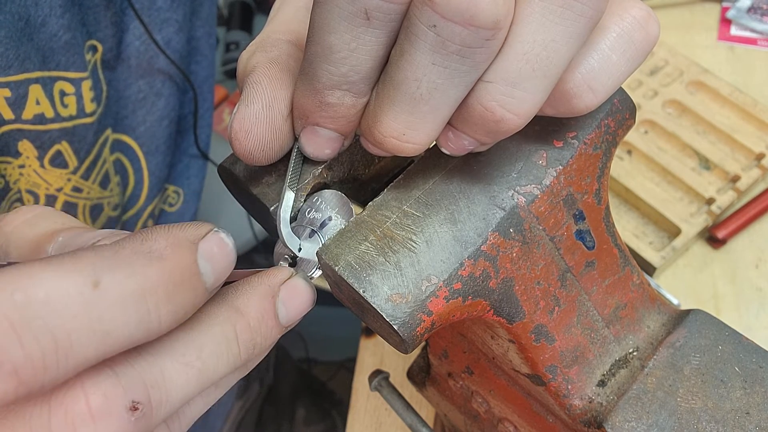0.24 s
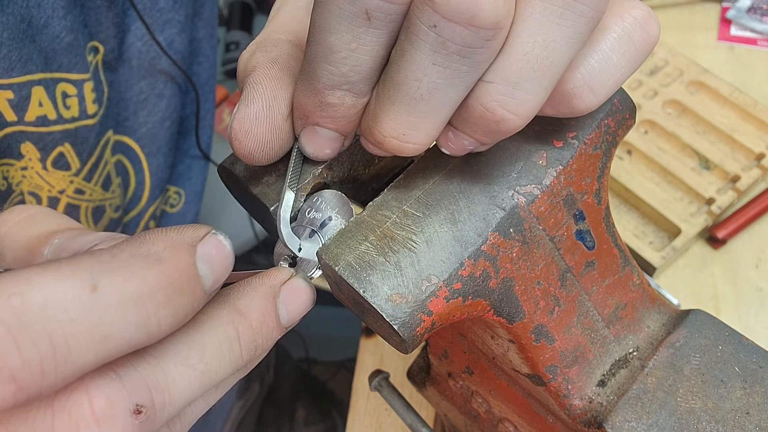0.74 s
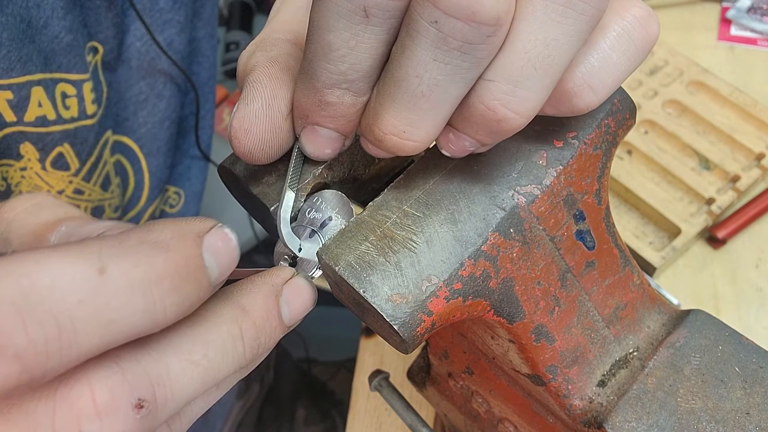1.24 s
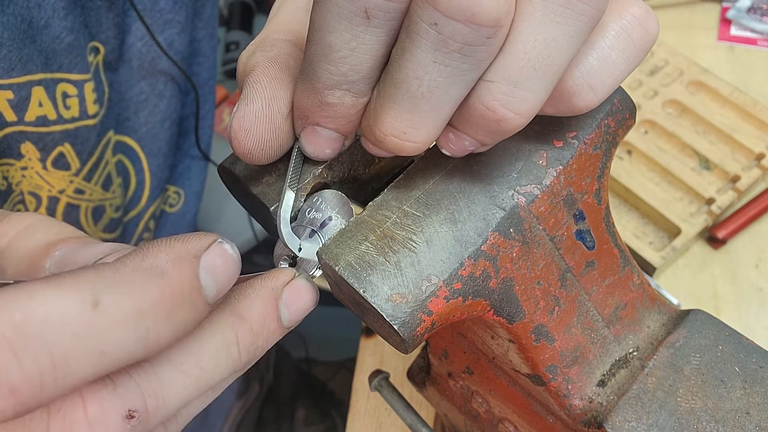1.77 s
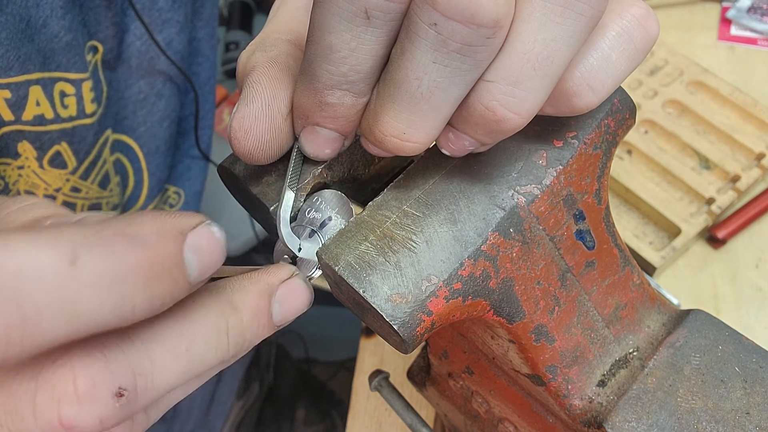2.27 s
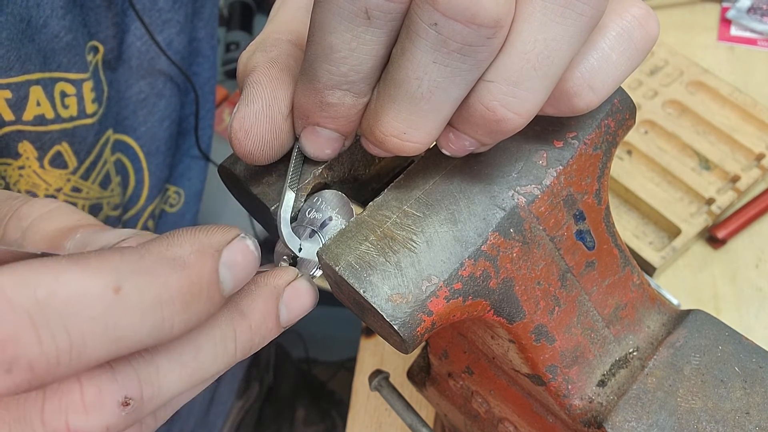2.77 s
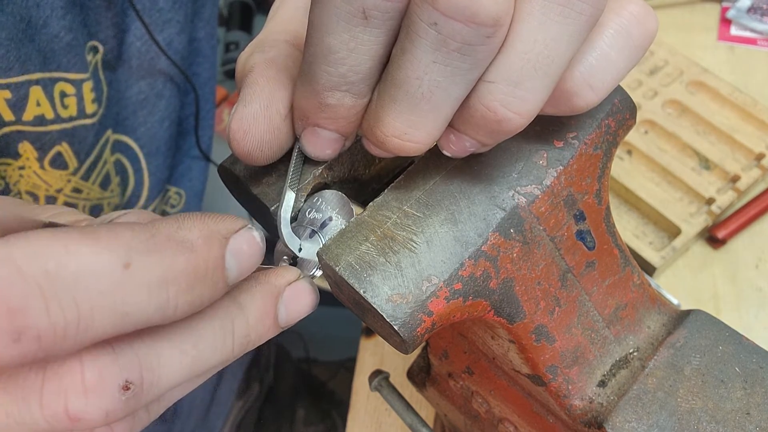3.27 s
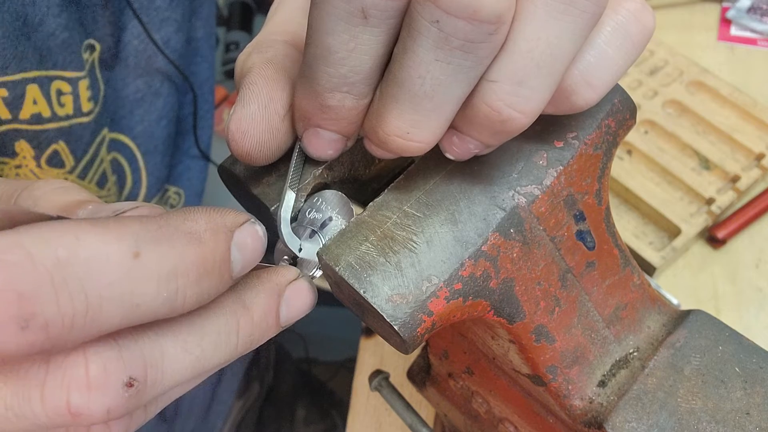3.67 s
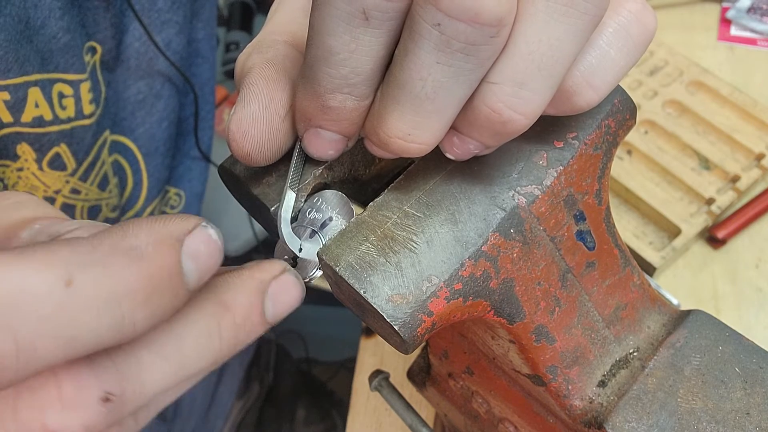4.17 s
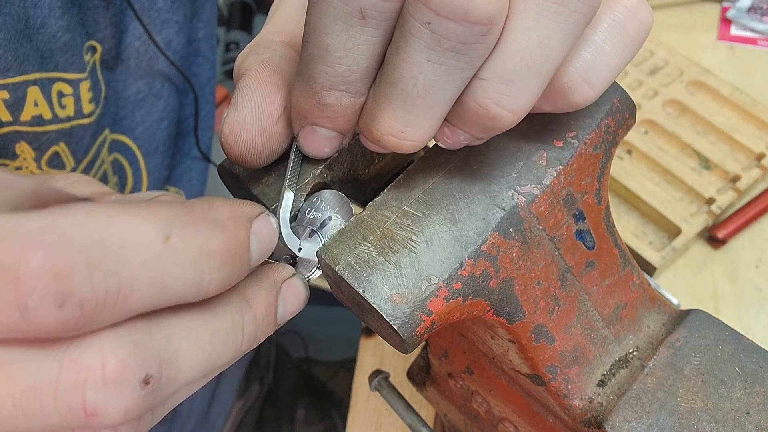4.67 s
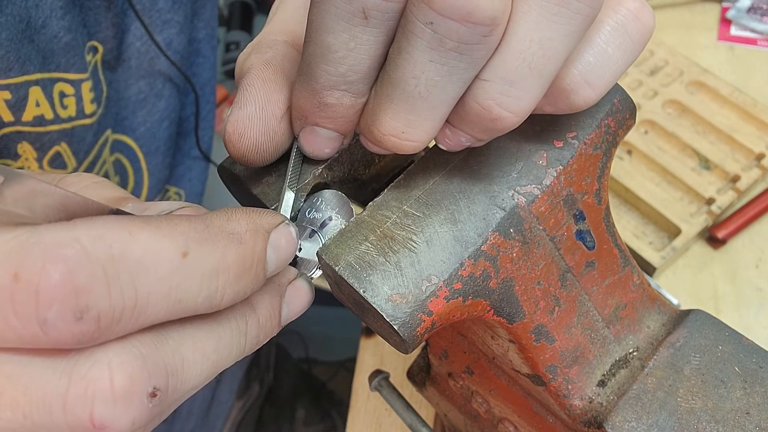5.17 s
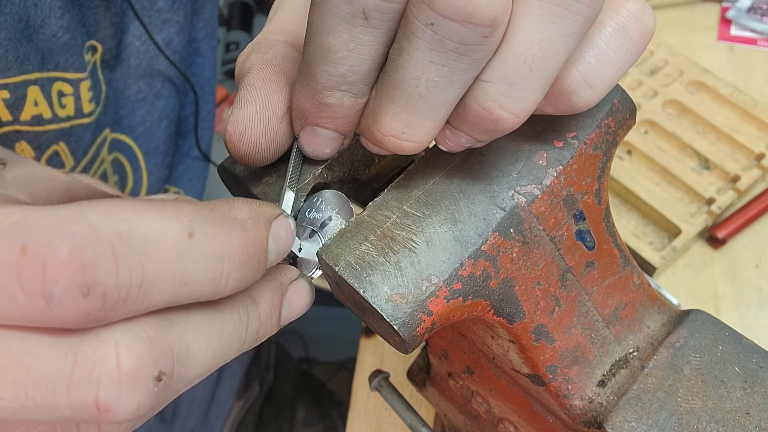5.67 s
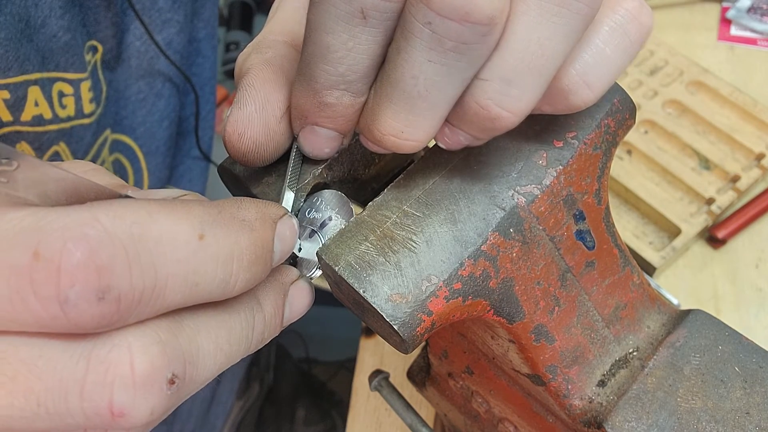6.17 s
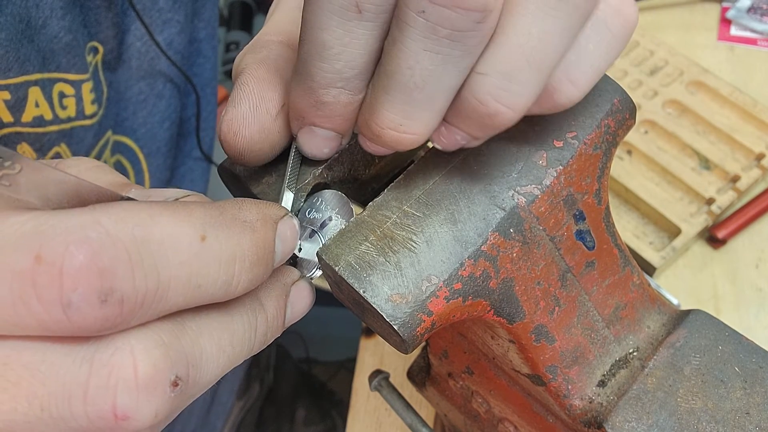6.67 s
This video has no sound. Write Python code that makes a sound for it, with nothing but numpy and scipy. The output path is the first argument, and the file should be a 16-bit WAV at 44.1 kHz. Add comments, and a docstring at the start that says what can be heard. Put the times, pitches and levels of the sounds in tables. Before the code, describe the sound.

A steel pick clicks, ticks and faintly scrapes inside a lock, with two sharp pin snaps over a low steady hum.

```python
"""A steel pick probes the pins of a lock clamped in a bench vice, heard from close by.
Freed pins snap, the pick scrapes and ticks along the keyway, and a hand softly bumps the vice.
Every contact makes lock, tools and vice ring with a set of quickly fading tones.
A small workshop adds a short echo, over a low machine hum, rumbling air and faint hiss."""
import sys
import numpy as np
from scipy import signal
from scipy.fft import rfft, irfft
from scipy.io import wavfile

SR = 44100
rng = np.random.default_rng(int(sys.argv[2]) if len(sys.argv) > 2 else 0)


def unload_audio(sound):
    """Save the sound as a 16-bit wav file, at the path given as the first command line argument."""
    columns = np.transpose(np.atleast_2d(sound))
    # keep every value between -1 and 1, then stretch to whole-number steps
    steps = np.round(np.clip(columns, -1, 1) * 32767)
    wavfile.write(sys.argv[1], SR, steps.astype(np.int16))


N = 306035

# how loud the machine hums over time: t/s, level/dB
HUM_LEVELS = [(0.0, -49), (0.11, -39), (0.25, -60), (0.31, -43), (0.73, -55), (0.81, -80), (0.87, -45.5),
              (1.35, -51), (2.61, -42.5), (3.75, -45.5), (3.94, -39.5), (4.1, -51), (4.91, -56),
              (4.95, -45), (6.67, -42), (6.94, -49)]
# weak overtones and whines above the hum: f/Hz, level/dB
HUM_TONES = [(119.9, -59.5), (179, -69), (210.6, -67.5), (308, -68), (480, -74), (540, -70), (660, -75),
             (1260, -82), (1500.5, -72), (3001, -83)]
# air noise of the workshop: f/Hz, level/(dB per Hz)
AIR_RUMBLE = [(15, -80.5), (30, -80), (46, -70.5), (70, -66), (100, -72.5), (145, -81), (220, -82),
              (330, -83.5), (560, -91.5), (820, -91.5), (1100, -101), (1450, -101), (2000, -114),
              (4000, -130)]
# microphone hiss: f/Hz, level/(dB per Hz)
MIC_HISS = [(2850, -112), (3100, -106), (6800, -107), (7300, -113), (9500, -112), (12900, -114),
            (13600, -109), (15800, -111)]
# tones that lock, tools and vice ring with: f/Hz, energy/dB, t60/s (time to fade by 60 dB)
METAL_TONES = [(226, -21.5, 0.31), (432, -9.5, 0.026), (1400, -22, 0.0061), (1640, -2, 0.0088),
               (1820, -7.5, 0.0092), (2120, -5.5, 0.018), (2530, -12.5, 0.0031), (2850, -8, 0.019),
               (3094, -6.5, 0.032), (3372, -7, 0.1), (4330, -40, 0.081), (5030, -9.5, 0.014),
               (6130, -19, 0.0036), (8500, -2.5, 0.0011), (8950, -10.5, 0.0017), (13300, -17, 0.0037)]
# a pin snaps free: t/s, strength/dB, vice knock/dB, lock ring/dB, pick pitch/Hz, pick ping/dB,
# wrench clack/dB, wrench overtone/dB, delay of second blow/s, second blow against first/dB
PIN_SNAPS = [(0.3056, -9, -39.5, 0.5, 1640, -3, -2.5, -9, 0.0019, -9.5),
             (1.9977, -21, -41.5, 4, 1880, 6, -5.5, 4.5, 0.001302, 10.5)]
# the thin, very brief ring of a pin: f/Hz, energy/dB, t60/s
PIN_TONES = [(4970, -8.5, 0.013), (6400, -27.5, 0.0093), (8830, -8, 0.01), (13700, 2.5, 0.0076)]
# the tension wrench that turns the lock, damped by a finger: f/Hz, level/dB, t60/s
WRENCH_TONES = [(1207, -29.5, 0.033), (1275, -31, 0.013)]
# how long the room echoes: f/Hz, t60/s
ECHO_TIMES = [(200, 0.74), (1200, 0.46), (3400, 0.42), (8000, 0.49), (15000, 0.43)]
# tone colour of the echo: f/Hz, level/dB
ECHO_COLOUR = [(400, 0.5), (750, 0), (1300, -2.5), (1750, -3.5), (2150, -6.5), (2600, -6.5), (3400, -7),
               (4500, -10.5), (6000, -15), (9000, -17), (11500, -15), (13800, -24)]
# strokes along the keyway: start/s, end/s, strength/dB, lock ring/dB, squeak/dB, pick pitch/Hz
PICK_STROKES = [(1.451, 1.59, -67.5, 5.5, -14, 2020), (1.711, 1.802, -66, 1.5, -8, 1860),
                (2.245, 2.328, -63, 0, -12, 1900), (2.41, 2.494, -67, 2, -3, 1800),
                (2.507, 2.626, -68, 5, -16, 1850), (2.74, 2.804, -68, 5, -10, 1950),
                (4.059, 4.163, -57.5, 5, -14, 2730), (4.21, 4.26, -70, 8, -15, 2160),
                (4.33, 4.408, -61.5, 1, -32, 2120), (4.51, 4.593, -58.5, 4, -2, 1840),
                (5.026, 5.123, -67, 2, -12, 1640)]
# touches of the pick, single or in quick runs: t/s, strength/dB, lock ring/dB, slide/ms, ping pitch/Hz (the
# pick's, or a pin's for the highest)
PICK_TOUCHES = [(1.539, -49, 15, 2.3, 2070), (1.736, -52, -8, .3, 1800), (1.772, -52, 4, .3, 1770),
                (2.182, -25.5, 2, 0.45, 3380), (2.185, -22.5, 3, 1.5, 2020), (2.1872, -21.5, 9, 1.1, 1620),
                (2.203, -34, 10, 3, 1640), (2.2272, -27.5, 2.5, 1.5, 3300), (2.304, -39.5, 11.5, 2.2, 3270),
                (2.4487, -41, 1, 0.6, 1810), (2.5793, -42, 13, 4.6, 1800), (2.797, -49, 2, 2.6, 6000),
                (4.068, -40, 14, 2.2, 1550), (4.0758, -22, -9, 1.4, 3000), (4.084, -22.5, 0, 0.66, 3200),
                (4.085, -23, 6, 2.7, 3300), (4.093, -30, 0, 0.56, 2980), (4.1125, -22, 5, 0.44, 9300),
                (4.1181, -31, 11, 1.1, 3180), (4.1295, -29, 0, .6, 2140), (4.1309, -27, 2, 1.8, 3000),
                (4.164, -20, 2, 0.68, 1690), (4.167, -15, 7, 1.4, 2120), (4.1722, -13.5, 6, 1.1, 1820),
                (4.1765, -19.5, 2, 1.1, 2100), (4.179, -16.5, 5, 2, 3200), (4.2328, -31, -8, 1.1, 8200),
                (4.245, -37, 3, 1.6, 9000), (4.404, -31.5, 11, 2, 3340), (4.585, -27.5, 6, 2.2, 2090),
                (4.844, -29.5, 8.5, 2.3, 2390), (4.986, -34, 0, 4.4, 3120), (5.014, -23.5, 2, 6.4, 1656),
                (6.0402, -24.5, -6, 1.3, 1620)]
# the hand bumps the vice: t/s, strength/dB, slide/ms, pick pitch/Hz
HAND_BUMPS = [(6.32, -33, 18, 2100)]
# flesh passes almost no treble: f/Hz, level/dB
FLESH_COLOUR = [(300, 17), (1000, 14), (1600, 4), (2100, 3), (4000, -9), (9000, -42)]


def amp(db):
    """Turns decibels into a gain."""
    return 10 ** (np.asarray(db) / 20)


def unit_rms(x):
    """Scales a signal to an average (rms) level of 1."""
    return x / np.sqrt(np.mean(x ** 2) + 1e-20)


def look_up(points, hz):
    """Reads between the rows of a table, on a log-frequency axis."""
    f, value = np.transpose(points)
    return np.interp(np.log(hz + 1), np.log(f + 1), value)


def add(mix, s, sound):
    """Mixes a sound in at s seconds."""
    part = mix[round(s * SR):][:len(sound)]
    part += sound[:len(part)]


def drift(rate_hz):
    """Smooth random wobble; a higher rate moves faster."""
    hz = np.fft.rfftfreq(N, 1 / SR)
    return unit_rms(irfft(rfft(rng.standard_normal(N)) * np.exp(-(hz / rate_hz) ** 2), N))


def tint(x, points):
    """Colours a sound by an f/Hz, level/dB table, with no ringing ahead of it (minimum phase)."""
    size = 1024
    log_gain = np.log(amp(look_up(points, abs(np.fft.fftfreq(size, 1 / SR)))))
    taps = np.fft.ifft(np.exp(np.conj(signal.hilbert(log_gain)))).real
    return signal.fftconvolve(x, taps[:size // 2])[:len(x)]


def machine_hum(hum_hz=59.23, waver_hz=0.91, throb=0.24, tone_waver_hz=0.62, tone_throb=0.18):
    """A machine hums low, with weak tones above; all waver in pitch and loudness."""
    level_db = np.interp(np.arange(N) / SR, *np.transpose(HUM_LEVELS))
    turns = np.cumsum(hum_hz + waver_hz * drift(6)) / SR
    out = amp(level_db) * unit_rms(np.sin(2 * np.pi * turns) * (1 + throb * drift(53)))
    sway, wander = drift(37), drift(1.76)
    for hz, db in HUM_TONES:
        lag = rng.integers(N)  # each tone wobbles in its own time
        turns = np.cumsum(hz + tone_waver_hz * np.roll(wander, lag)) / SR
        out += amp(db) * unit_rms(np.sin(2 * np.pi * turns) * (1 + tone_throb * np.roll(sway, lag)))
    return out


def steady_noise(points):
    """Air rumble or hiss: even noise shaped by a table."""
    gain = amp(look_up(points, np.fft.rfftfreq(N, 1 / SR))) * np.sqrt(SR / 2)
    return irfft(rfft(rng.standard_normal(N)) * gain, N)


def lock_ring(thud_db, ring_db, sharp_db, pick_hz, pick_db=-5, extra_tones=(), detune=0.027, crack_db=-7):
    """The metal rings after one contact; the place touched shifts its tones a little."""
    t = np.arange(SR // 4) / SR
    ping = (pick_hz, pick_db, 36 / pick_hz)  # the pick fades in 36 cycles
    hz, db, t60 = np.transpose([*METAL_TONES, ping, *extra_tones])[:, :, None]
    shift, phase = rng.standard_normal((2, len(hz), 1))
    tones = np.sin(2 * np.pi * (hz * (1 + detune * shift) * t + phase)) * amp(-60 * t / t60)
    tones *= amp(db) / np.linalg.norm(tones, axis=1, keepdims=True)
    crack = rng.standard_normal(len(t)) * np.exp(-t / 0.0077)  # crowded tones that die at once
    click = 1. * (t == 0)  # the sudden stop of the pin
    body = unit_rms(tones.sum(0)) + amp(crack_db) * unit_rms(crack) + amp(-4) * unit_rms(click)
    # a hard snap shakes the vice (thud), a sideways push rings the lock, a sharp edge adds treble
    colour = [(100, thud_db + 7.5), (420, thud_db), (700, thud_db - 6),
              (1200, (thud_db + ring_db) / 2 + 6.5),
              (1650, ring_db), (2100, ring_db), (2500, ring_db + 2), (3300, ring_db),
              (4300, 7.4), (6000, 11.9), (8500, 11.2), (10000, 10.9), (11500, 5.5),
              (13500, sharp_db), (14800, sharp_db), (16000, sharp_db - 8)]
    return tint(body / np.linalg.norm(body), colour)


def strike(slide_ms, *ring_args, **ring_options):
    """A blow, followed by tiny slips that die away, rings the lock."""
    ms = 1000 * np.arange(2048) / SR
    slips = rng.standard_normal(len(ms)) * np.exp(-ms / slide_ms)
    force = 0.97 * slips / np.linalg.norm(slips)
    force[0] += .5  # the blow itself
    spectrum = rfft(np.roll(force, 8))
    force = irfft(spectrum / (abs(spectrum) + 1e-9))[:len(ms) // 2]  # equally strong at all pitches
    return signal.fftconvolve(force / np.linalg.norm(force), lock_ring(*ring_args, **ring_options))


def pin_snaps(knock_hz=417.5, knock_rise_s=0.0016, knock_t60=0.07, overtone_hz=3430, overtone_t60=0.03):
    """A freed pin strikes twice, hard enough to clack the wrench and knock the vice."""
    out, t = np.zeros(N), np.arange(SR // 4) / SR
    rise = 1 - np.exp(-t / knock_rise_s)  # the heavy vice answers slowly
    knock = np.sin(2 * np.pi * knock_hz * t) * rise * amp(-60 * t / knock_t60)
    clack = sum((-1) ** k * np.sin(2 * np.pi * hz * t) * amp(db - 60 * t / t60)
                for k, (hz, db, t60) in enumerate(WRENCH_TONES))
    for s, db, knock_db, ring_db, pick_hz, pick_db, clack_db, overtone_db, gap_s, second_db in PIN_SNAPS:
        jolted = [*PIN_TONES, (overtone_hz, overtone_db, overtone_t60)]
        for delay, blow_db in (0, db), (gap_s, db + second_db):
            blow = strike(slide_ms=1, thud_db=4, ring_db=ring_db, sharp_db=9.5, pick_hz=pick_hz,
                          pick_db=pick_db, extra_tones=jolted, detune=0.0034, crack_db=-10)
            add(out, s + delay, amp(blow_db) * blow)
        add(out, s, amp(knock_db) * knock + amp(clack_db) * clack)
    return out


def workshop_echo(x, first_s=0.00063, build_s=0.00052):
    """Sound bounces off bench and walls many times; the bass lasts longest."""
    t = np.arange(SR * 3 // 4) / SR
    bounces = rng.standard_normal(len(t)) * np.clip((t - first_s) / build_s, 0, 1)
    hz, age_s, bands = signal.stft(bounces, SR, nperseg=256)
    t60 = look_up(ECHO_TIMES, hz)[:, None]
    even_energy = np.sqrt(2 * np.log(1000) / (t60 * SR))  # a longer fade adds no energy
    bands *= amp(look_up(ECHO_COLOUR, hz)[:, None] - 60 * age_s / t60) * even_energy
    return signal.fftconvolve(x, signal.istft(bands, SR, nperseg=256)[1])[:N]


def pick_scrapes(slips_per_s=650, spots=6, pitch_spread=0.093, squeak_hz=6100, squeak_t60=0.013):
    """Steel on brass sticks and slips in many small steps; each spot rings a little differently."""
    out = np.zeros(N)
    for start, end, db, ring_db, squeak_db, pick_hz in PICK_STROKES:
        n = round((end - start) * SR)
        slipping = rng.random(SR)[:n] < slips_per_s / SR
        size_db = -0.5 * np.minimum(rng.exponential(1, SR)[:n], 4)
        spot = rng.integers(spots, size=SR)[:n]
        pressure = np.sin(np.pi * np.linspace(0, 1, n) ** 1.02)  # builds, then lets go a bit faster
        slips = unit_rms(slipping * amp(size_db) * pressure)
        pick_db = ring_db / 2 - 3  # pressed harder, the pick sings more
        for k, shift in enumerate(1 + pitch_spread * np.linspace(-1, 1, spots)):
            squeak = (squeak_hz * shift, squeak_db, squeak_t60)  # the tip squeaks where it bites
            ring = lock_ring(thud_db=-5, ring_db=ring_db, sharp_db=3, pick_hz=pick_hz * shift,
                             pick_db=pick_db, extra_tones=[squeak], detune=.04)
            add(out, start, amp(db) * signal.fftconvolve(slips * (spot == k), ring))
    smoothing = np.exp(-2 * np.pi * 2400 / SR)  # softens the treble above 2400 Hz
    return signal.lfilter([1 - smoothing], [1, -smoothing], out)


def pick_ticks(thud_db=4, dulling_db_per_ms=4, singing_db_per_ms=2):
    """Light touches: short ones are sharp, sliding ones are duller and ring out a ping."""
    out = np.zeros(N)
    for s, db, ring_db, slide_ms, pick_hz in PICK_TOUCHES:
        sharp_db = 19.5 - dulling_db_per_ms * slide_ms
        pick_db = 1 + singing_db_per_ms * slide_ms
        add(out, s, amp(db) * strike(slide_ms, thud_db, ring_db, sharp_db, pick_hz, pick_db))
    return out


def hand_bump():
    """The hand knocks the same metal, muffled by the flesh."""
    out = np.zeros(N)
    for s, db, slide_ms, pick_hz in HAND_BUMPS:
        knock = strike(slide_ms, thud_db=0, ring_db=0, sharp_db=0, pick_hz=pick_hz)
        add(out, s, amp(db) * tint(knock, FLESH_COLOUR))
    return out


def scene():
    """The picking, its echo and the background, in one channel."""
    picking = pin_snaps() + pick_ticks() + pick_scrapes() + hand_bump()
    echo = workshop_echo(picking)
    background = machine_hum() + steady_noise(AIR_RUMBLE) + steady_noise(MIC_HISS)
    return (picking + echo + background)[None]


def record(dry):
    """Cuts the highest treble, above 16200 Hz."""
    low_pass = signal.firwin(255, 16200, window=("kaiser", 9), fs=SR)
    return signal.oaconvolve(dry, low_pass[None], "same")


dry = scene()
out = record(dry)
unload_audio(out)
```